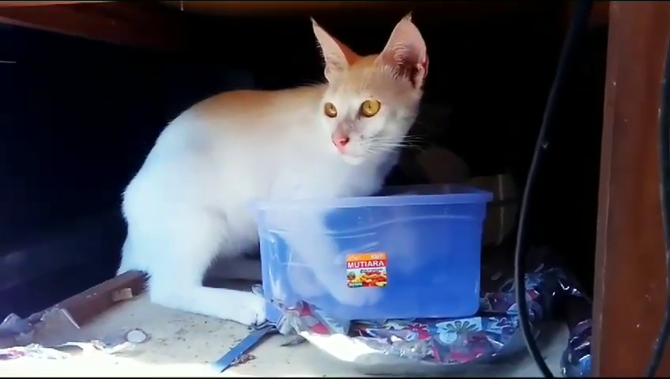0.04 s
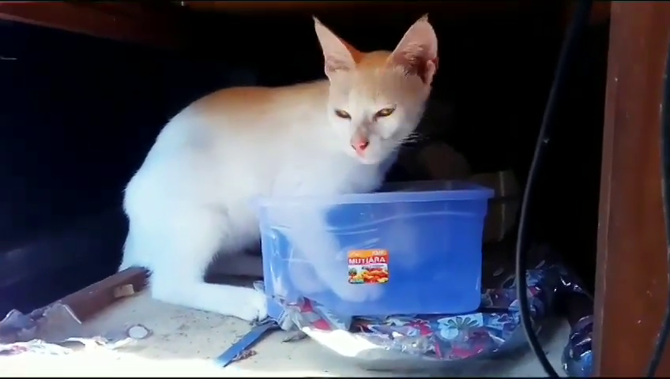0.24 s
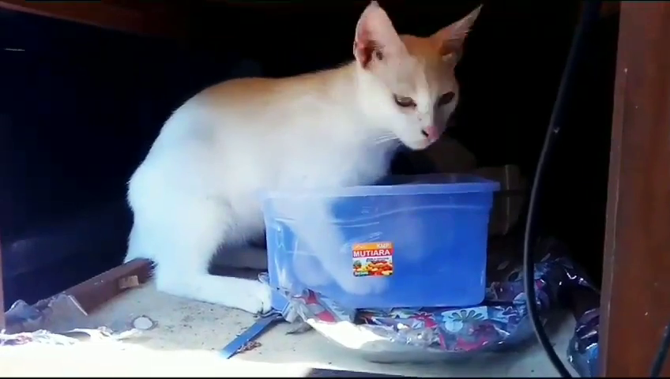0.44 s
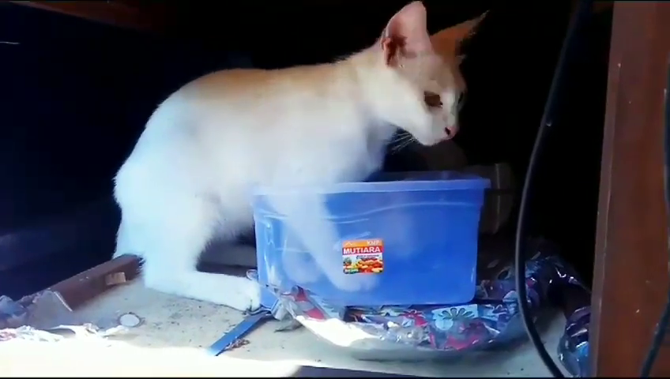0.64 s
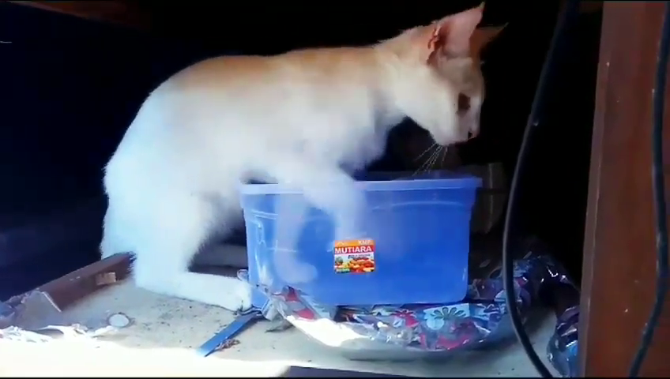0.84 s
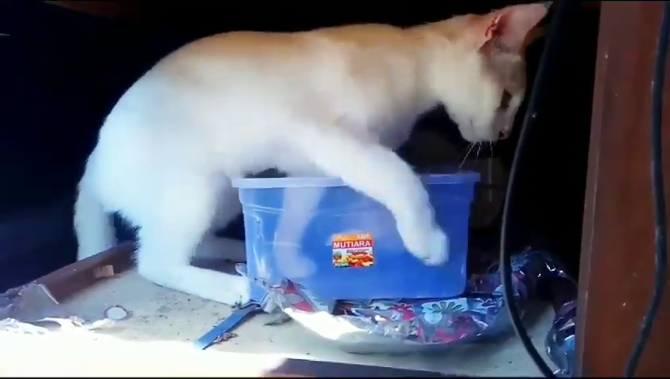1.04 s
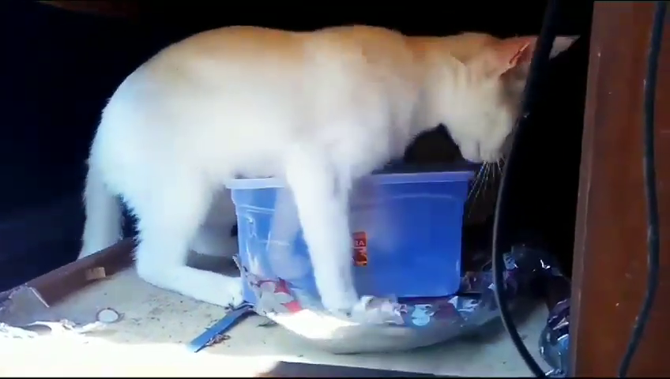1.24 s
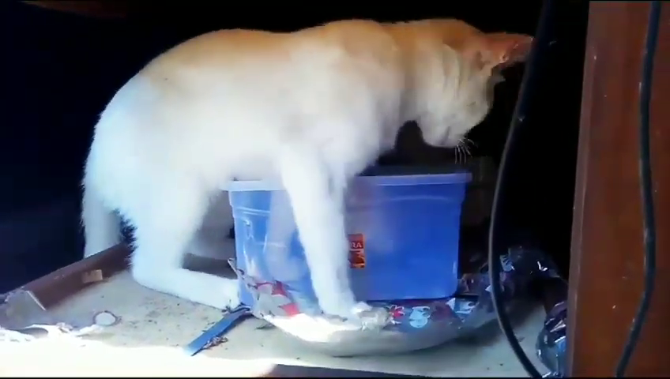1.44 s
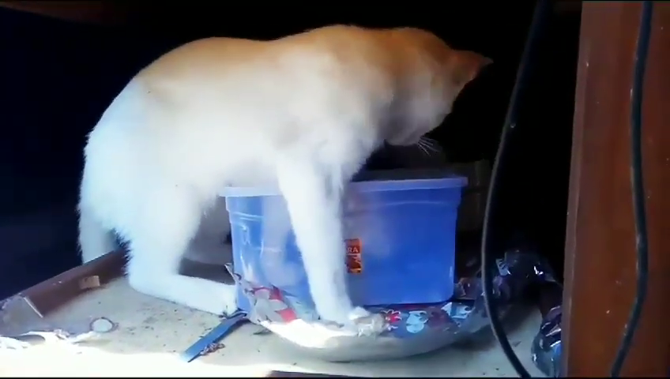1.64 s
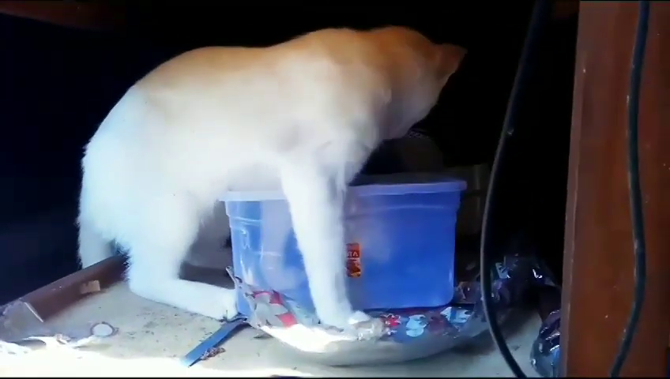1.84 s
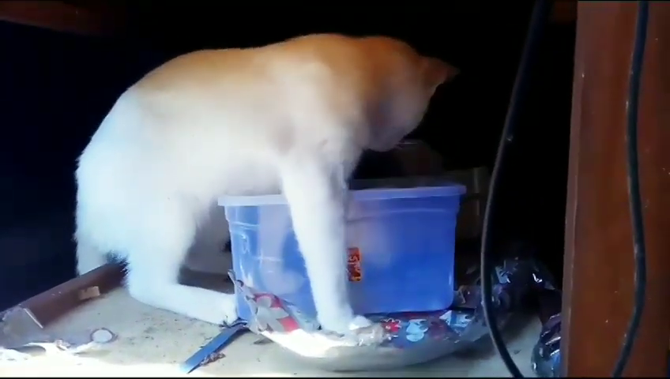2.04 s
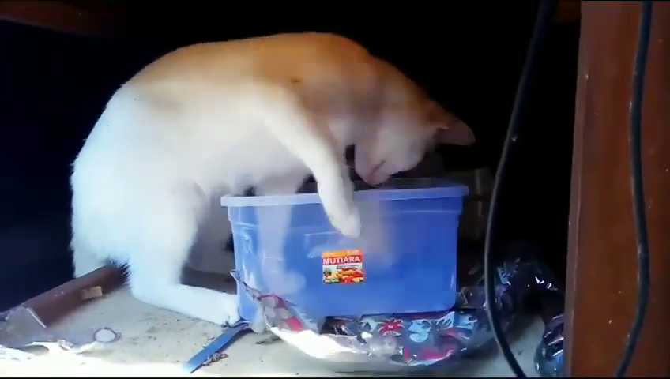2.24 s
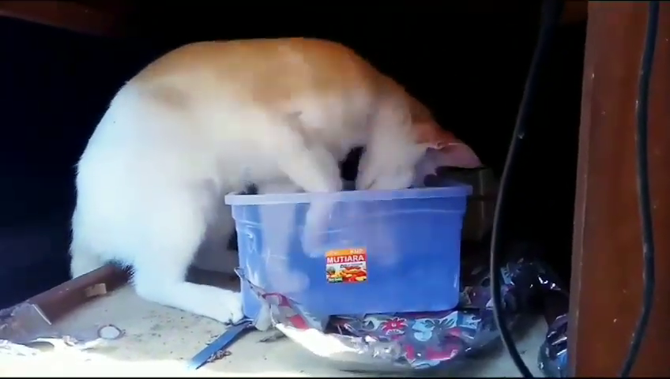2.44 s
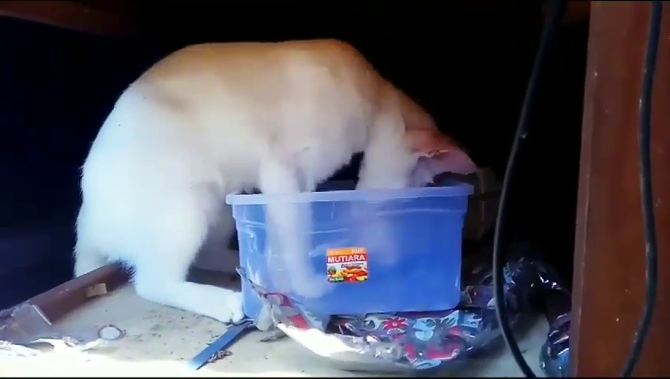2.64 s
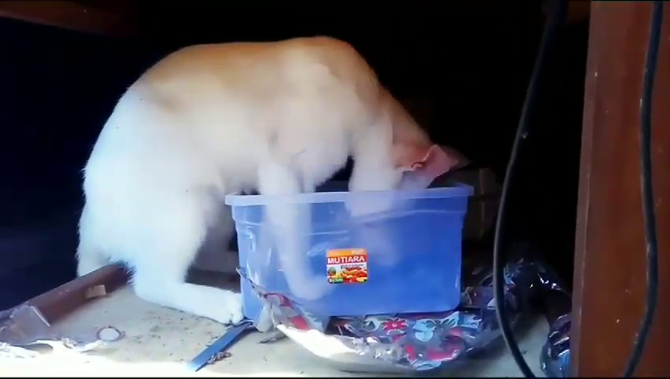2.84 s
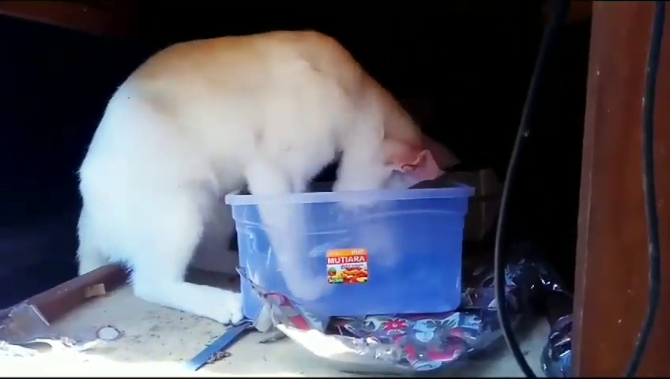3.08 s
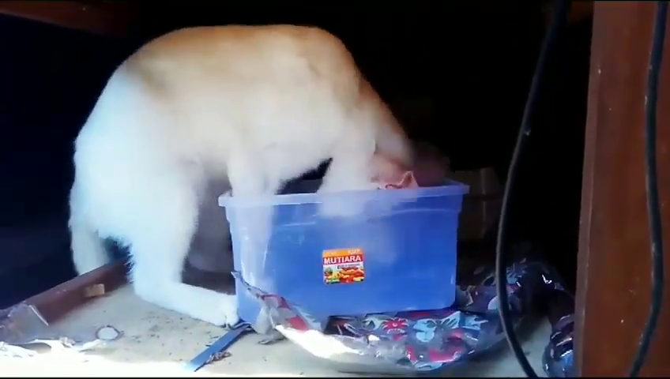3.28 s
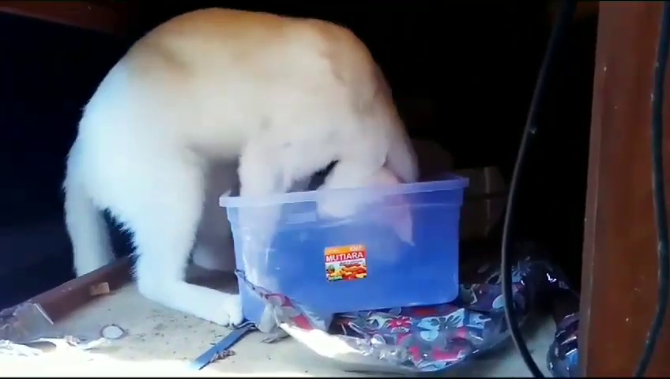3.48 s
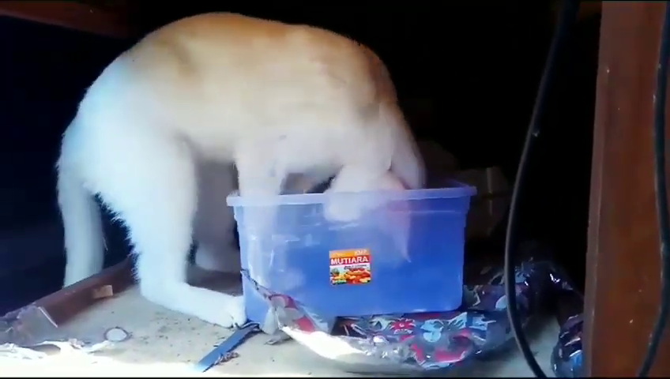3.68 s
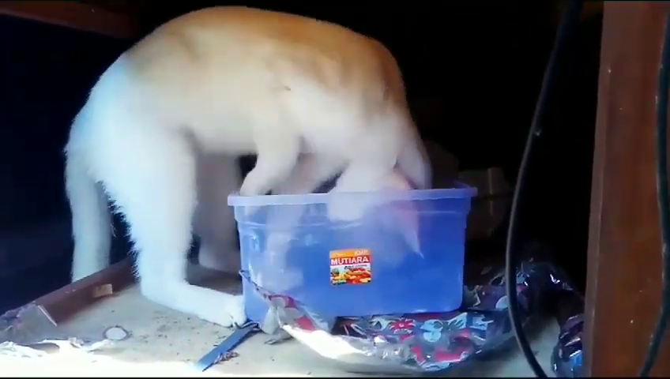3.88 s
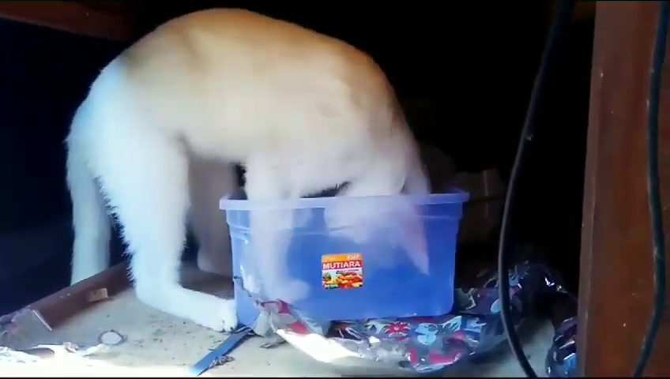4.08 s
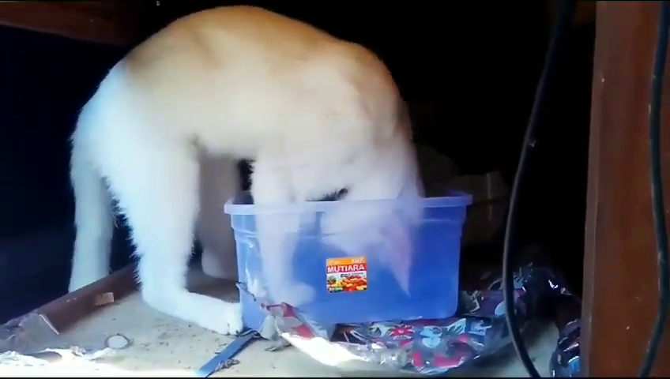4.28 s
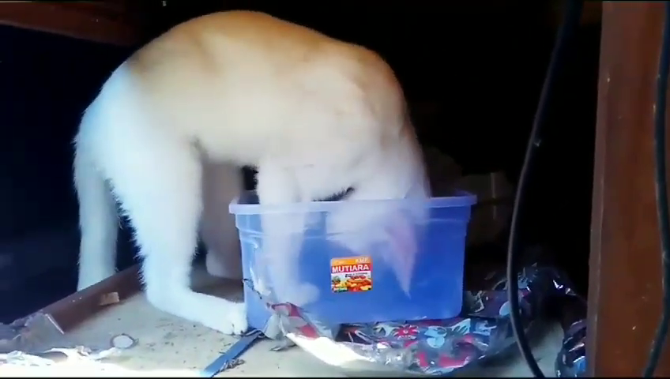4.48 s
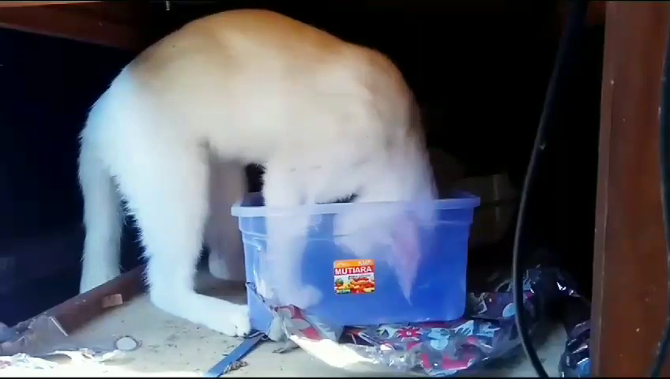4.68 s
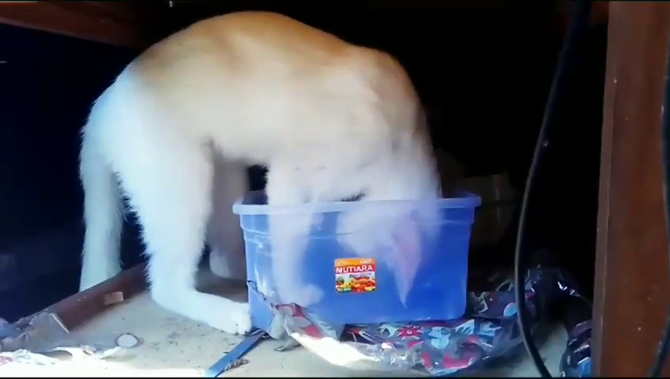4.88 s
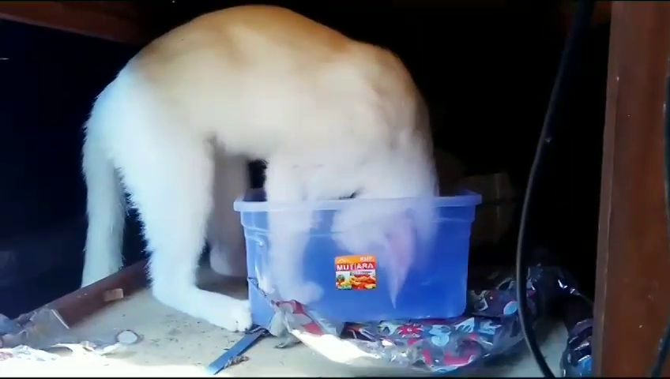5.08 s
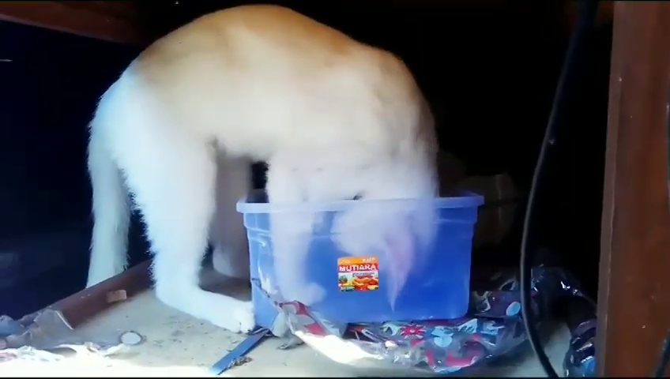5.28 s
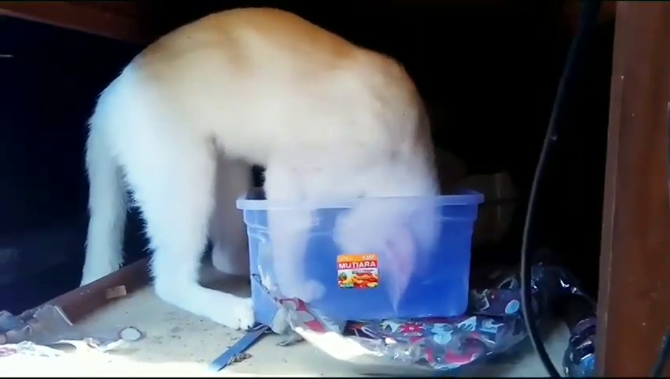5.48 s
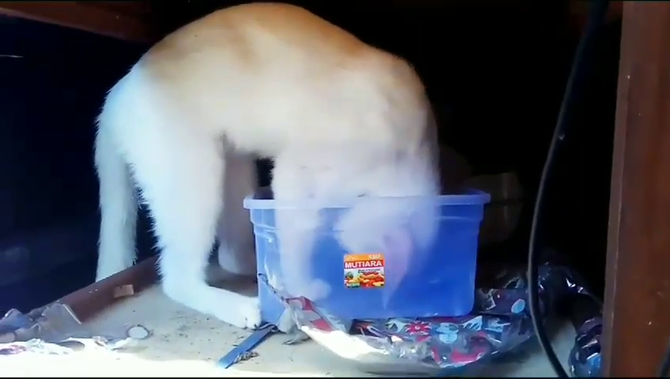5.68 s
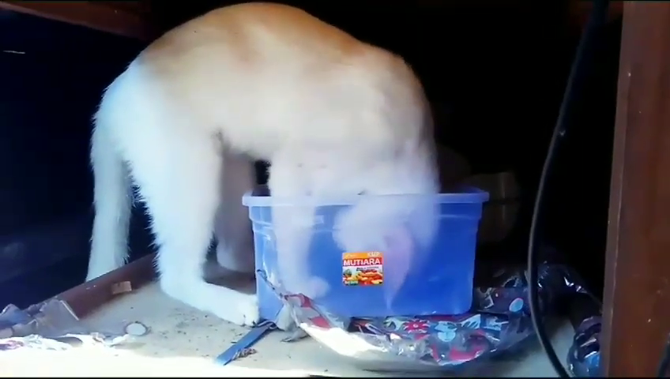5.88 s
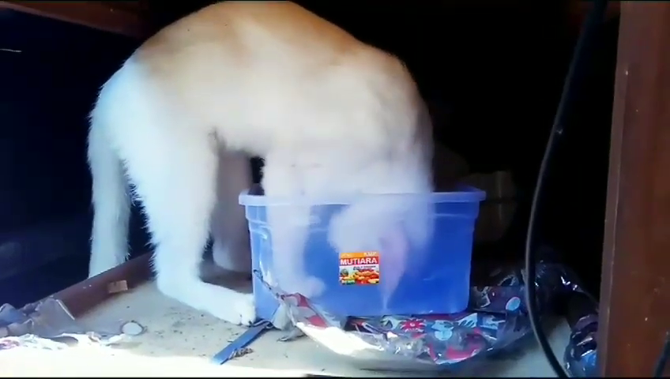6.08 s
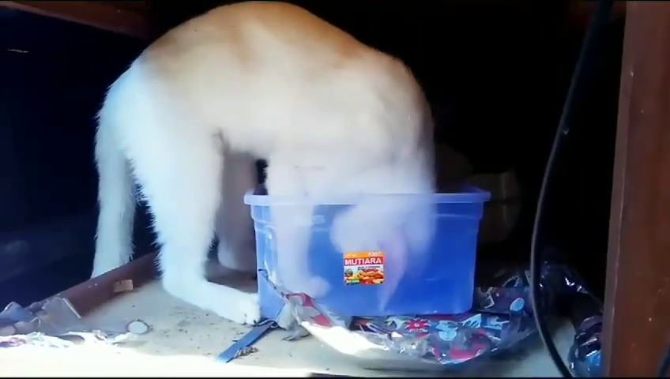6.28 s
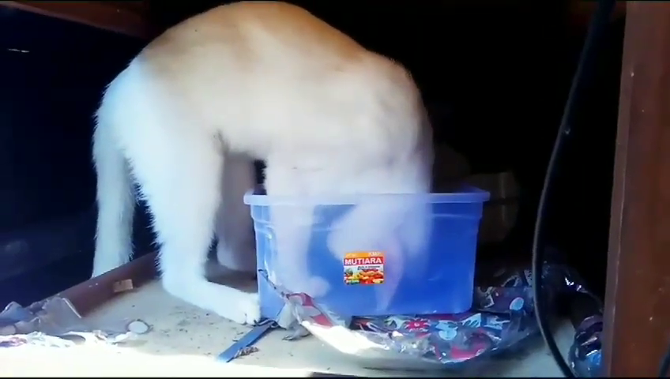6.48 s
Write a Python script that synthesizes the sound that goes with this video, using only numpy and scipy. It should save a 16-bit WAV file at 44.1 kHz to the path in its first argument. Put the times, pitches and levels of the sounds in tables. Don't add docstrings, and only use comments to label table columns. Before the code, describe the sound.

Faint distant engine rumble and a thin, whistling hiss, stronger on the right, underlie close plastic noises. A soft creak comes first, then a quick crinkly bump and sparse wrapper ticks. Hard knocks, thumps and scratchy scrapes follow on a light tub. Finally the tub bottom pops repeatedly in a steady licking rhythm, with grainy rasps, clicks and a brief low groan near the end. The echo is short and dry.

```python
import sys
import numpy as np
from scipy import signal
from scipy.fft import rfft, irfft
from scipy.io import wavfile
from scipy.ndimage import uniform_filter1d

SR = 44100
rng = np.random.default_rng(int(sys.argv[2]) if len(sys.argv) > 2 else 0)


def linear_from_db(decibels):
    return 10 ** (np.asarray(decibels, float) / 20)


def output_pcm(signal):
    pcm = np.clip(np.atleast_2d(signal).T, -1, 1) * 32767
    wavfile.write(sys.argv[1], SR, np.round(pcm).astype(np.int16))


N = 287973
TIME = np.arange(N) / SR

# [f/Hz, level/dB, t60/s]
THUD = [(119.4, -4, 0.061), (166.7, 1.5, 0.1), (229.4, -3.5, 0.25), (363, -3.5, 0.06)]
BOOM = [(418, -13.5, 0.023), (566, -3, 0.1), (580, -6, 0.19), (693.5, -3.5, 0.057), (804, 0, 0.24),
        (878.5, -5.5, 0.057), (978, -10.5, 0.016)]
KNOCK = [(1130, -10.5, 0.42), (1237, -11, 0.064), (1511, 3, 0.043), (1554, -3, 0.0093), (1816, -1.5, 0.036),
         (1990, -5, 0.034), (2300, -1.5, 0.026), (2891, 1.5, 0.0083), (2964, 0.5, 0.011),
         (3200, -18.5, 0.028), (3600, -5, 0.044), (4250, -15, 0.0026)]
# [f/Hz, level/dB]
CRACK = [(2800, -9.5), (4000, 9), (5500, 6.5), (6500, 7), (8000, 3), (12000, 2), (17000, -2)]
# [t/s, knock peak level/dB, boom relative level/dB, crack relative level/dB, hollow note f/Hz]
LICK_POPS = [
    (4.3873, -15, -11, -16.5, 852),
    (4.6953, -14, -5.5, -8, 878),
    (5.0192, -13, -9, -9.5, 873),
    (5.377, -12.5, -8, -9, 892),
    (5.7572, -14, -9, -11.5, 920),
    (6.12, -11.5, -13.5, -14, 907),
    (6.508, -13, -7.5, -10, 905),
]


def colour(x, points):
    hz, db = np.transpose(points)
    grid = np.fft.rfftfreq(4096, 1 / SR)
    cepstrum = irfft(np.interp(np.log(grid + 1), np.log(hz), db) * np.log(10) / 20)
    cepstrum[1:2048] *= 2
    cepstrum[2049:] = 0
    taps = irfft(np.exp(rfft(cepstrum)))[:2048]
    return signal.fftconvolve(np.atleast_2d(x), taps[None], axes=1)[:, :x.shape[-1]]


def walk(rate):
    k = int(SR / rate)
    held = np.repeat(rng.standard_normal(N // k + 1), k)
    return uniform_filter1d(uniform_filter1d(held, k), k)[:N]


def pair(length, alike_hz=700):
    same, own = rng.standard_normal(length), rng.standard_normal((2, length))
    low = signal.butter(1, alike_hz, fs=SR)
    return own + signal.lfilter(*low, same - own)


def swell(s, db, rise_s, fall_s):
    late = TIME[::32] - s
    rise = (np.maximum(-late, 0) / rise_s) ** 1.37
    return linear_from_db(db - 20 * rise - 20 * np.maximum(late, 0) / fall_s)


def blend(gains):
    return np.interp(TIME, TIME[::32], np.sqrt(np.sum(np.square(gains), axis=0)))


def body(x, modes, widen, patchy_db=0.):
    out = 0
    for k, (hz, db, t60) in enumerate(modes):
        pole = np.exp(-np.log(1000) * widen / (t60 * SR))
        feedback = [1, -2 * pole * np.cos(2 * np.pi * hz / SR), pole ** 2]
        mode = signal.lfilter([1 - pole, 0, pole - 1], feedback, x)
        out = out + (-1) ** k * linear_from_db(db + patchy_db * walk(28)) * mode
    return out / out.std()


def ring(modes, t, shorten, tilt_db=0, scatter=0.99):
    hz, db, t60 = np.array(modes).T[:, :, None]
    size, bend, turn, apart = rng.standard_normal((4, len(modes), 1))
    size, bend, turn = scatter * size, scatter * bend, scatter * turn
    ears = np.array([.5, -.5])[:, None, None] * apart * np.minimum(hz / 2200, 1.3)
    late = t - .00025 - np.array([.00007, 0])[:, None, None]
    waves = -np.cos(2 * np.pi * hz * (1 + .012 * bend) * late + .5 * turn + ears)
    level = linear_from_db(db + tilt_db * np.log2(hz / 2000) + 2 * size)
    out = np.sum(level * waves * 1000. ** (-t / (t60 * shorten)), axis=1)
    high = signal.butter(3, .7 * hz.min(), "high", fs=SR, output="sos")
    out = signal.sosfilt(high, out * np.minimum(t / .0003, 1))
    return out / np.abs(out).max()


def street():
    # [peak t/s, level/dB, rise t/s, fall t/s]
    traffic = [(0.0, -62.5, .3, 0.66), (.84, -57.5, 0.47, 0.68), (1.22, -52, 0.1, 0.12),
               (1.55, -59.5, 0.3, 0.72), (1.9, -56.5, 0.23, 0.17), (2.56, -62.5, 0.63, 0.4),
               (2.96, -57, 0.15, 0.16), (3.3, -60.5, .3, 3.1), (4.13, -58, 0.14, 0.24),
               (4.84, -53.5, 0.29, 0.14), (5.1, -60.5, 0.093, 1.4), (5.6, -55.5, 0.73, 0.94),
               (6.08, -56, 0.21, 2.1)]
    # [peak t/s, level/dB, rise t/s, fall t/s]
    motor = [
        (.3, -67.5, 1.5, 0.27),
        (.72, -72, 0.14, 1.1),
        (1.2, -68.5, 0.14, 0.82),
        (2.45, -63.5, 1.1, 0.15),
        (3.3, -73.5, 2.1, 30.0),
    ]
    # [f/Hz, level/dB per Hz]
    house = [(20, -104), (50, -102.5), (120, -87), (240, -96), (320, -103), (600, -105), (900, -112),
             (1500, -120)]
    rumble_modes = [(65.9, 3.0, 0.29), (80.0, -6, 0.06), (46.4, -8.5, 0.063)]  # f/Hz, level/dB, t60/s
    drone_modes = [(417.6, 4.5, 0.078), (613.0, 0.5, 0.26), (238.0, -11.5, 0.65)]
    rumble = body(rng.standard_normal(N), rumble_modes, 1.0)
    rumble *= blend([swell(*row) for row in traffic])
    hum = colour(pair(N, alike_hz=500), house) * np.sqrt(SR / 2) * linear_from_db(1.3 * walk(5.9))
    drone = body(pair(N), drone_modes, 1.34, patchy_db=3.5)
    drone = drone * blend([swell(*row) for row in motor])
    return rumble * linear_from_db(np.array([[-1.5], [1.5]])) + hum + drone


def hits(events, shorten, crack_s, trims_db, popped=False):
    # [f/Hz, level/dB, t60/s]
    bottom = [(1206, -7, 0.043), (1284, -1, 0.049), (1444, -1.5, 0.11), (1605, -15.5, 0.043),
              (1740, -2, 0.13), (2020, -6.5, 0.054), (2255, 4, 0.041), (2890, -0.5, 0.047),
              (2995, -1.5, 0.061), (3254, 1, 0.037), (3696, 1, 0.034), (4750, -12, 0.034)]
    # [f/Hz, level/dB, t60/s]
    undertones = [(511, -20, 0.034), (690, -11.5, 0.052)]
    knock_trim_db, boom_trim_db, crack_trim_db = trims_db
    flutter_s = .0023
    snap_s, snap_width_s, snap_hz = 0.0003, 0.00052, 1650
    out, t = np.zeros((2, N + SR)), np.arange(SR // 10) / SR
    hold = linear_from_db(-11 * np.clip((t - .0085) / 0.00058, 0, 1))
    flutter = hold * (.25 + np.exp(-(t % flutter_s) / .0006))
    bounce = np.r_[1, np.zeros(int(flutter_s * SR)), .55]
    rattle_band = signal.butter(2, [900, 3600], "band", fs=SR, output="sos")
    for s, db, boom_db, crack_db, *heavy in events:
        bright = [(hz, level_db + 0.42 * (crack_db - 1.0) * np.log2(hz / 8000)) for hz, level_db in CRACK]
        crack = colour(rng.standard_normal((2, len(t))) * np.exp(-t / crack_s) * flutter, bright)
        spot_hz = heavy[1] if heavy else 2200
        if popped:
            knock = ring(bottom, t, 0.78, scatter=.6)
            hollow = ring(undertones + [(spot_hz, 0, .08)], t, 1, scatter=.2)
        else:
            near = [(hz, mode_db + 4 * np.exp(-(np.log2(hz / spot_hz) / 0.2) ** 2), t60)
                    for hz, mode_db, t60 in KNOCK]
            knock = signal.lfilter(bounce, [1], ring(near, t, shorten, 0.42 * (crack_db + 21.5)))
            hollow = ring(BOOM, t, shorten, tilt_db=4.5)
        rattle = signal.sosfilt(rattle_band, pair(len(t), 2700))
        rattle = rattle * np.exp(-t / (0.0032 * shorten)) * np.minimum(t / 0.0012, 1)
        knock += linear_from_db(-7.5 if popped else -2.5) * rattle
        if popped:
            swing = t - snap_s - snap_width_s
            knock -= linear_from_db(-3) * np.cos(2 * np.pi * snap_hz * swing) * np.exp(-(swing / snap_width_s) ** 2)
        blow = linear_from_db(knock_trim_db) * hold * knock
        blow += linear_from_db(boom_db + boom_trim_db) * hold ** 2.2 * hollow
        blow += linear_from_db(crack_db + crack_trim_db) * crack / np.abs(crack).max()
        if heavy:
            thud = ring(THUD, t, 0.98) * np.minimum(t / 0.0005, 1) * (1 - t / t[-1])
            blow += linear_from_db(heavy[0] - 8.0) * thud
        start = int((s + .0005) * SR)
        out[:, start:start + len(t)] += linear_from_db(db) * blow
    return out[:, :N]


def blows():
    # [t/s, peak level/dB, crack relative level/dB]
    creases = [(0.794, -60, 1), (1.176, -33, 14.5), (1.1912, -32.5, 15.5), (1.3086, -53, 16.5),
               (1.324, -61, -17), (1.3491, -42.5, -7), (1.4086, -46, -1), (1.4224, -58, 7), (1.462, -49, 1),
               (1.5349, -55.5, 9), (1.636, -57.5, -5), (1.9936, -59.5, 3), (2.1338, -39, 0),
               (2.1484, -58, 26), (2.157, -45.5, 14), (2.173, -54.5, 23), (2.1815, -51, 23),
               (2.195, -37, 0), (2.2022, -39.5, 9), (2.2728, -42, 9.5), (2.384, -53, 15), (2.401, -49, 8),
               (2.4899, -38.5, 13), (2.545, -52, 7), (2.576, -55, -36), (2.6154, -64, 10),
               (2.6384, -57.5, 18), (2.515, -65, 13), (2.556, -60, 14), (2.757, -66, 9), (2.787, -55, 3),
               (2.316, -56, 8), (2.721, -44, 3), (2.7347, -41.5, -3.5), (3.1034, -51.5, 29)]
    # [t/s, knock peak level/dB, then boom, crack and thud relative level/dB]
    paws = [(1.112, -40, -7, -11, 10.5), (1.122, -43.5, -7, -15, 13.5), (1.2053, -38, -18, 8, -2),
            (2.872, -42, 2.5, 0.5, -3.5), (3.0955, -35, -17, -34, -18), (3.2363, -41, -10, -22, -12),
            (3.2442, -21.5, -16, -35, 8), (3.251, -20.5, -15, -14, 0.5), (3.259, -28, -5, -14, 6),
            (3.6098, -14.5, -10, -7, -31), (3.715, -29, -7, -46, 1), (4.0862, -24, -5, -37, 3),
            (4.0942, -17.5, -19, -3.5, -23), (4.153, -37, -6, 3, 4)]
    # [t/s, peak level/dB, boom and crack relative level/dB]
    claws = [(3.3424, -28.5, 0, -1), (3.479, -36, -24, -5), (3.8934, -29, -10, -2), (3.985, -53.5, -30, 15),
             (3.917, -36, -9, -3), (4.5076, -37, -16, -7), (4.536, -43, -20, 2), (4.6264, -44.5, -20, 3.5),
             (4.812, -40, -20, -7.5), (4.893, -44, -21, -1), (4.933, -39, -22.5, 0), (5.163, -49, -20, 1),
             (5.201, -40, -23, 5), (5.2686, -37, -23, 3.5), (5.281, -44, -19, -2), (5.6068, -35, -25, -0.5),
             (5.629, -28, -9.5, -10), (5.68, -51, -25, 2.5), (5.8905, -58, -25, -5),
             (5.9825, -33, -27, -10), (5.99, -37, -26, 1), (6.171, -35, -20, -4), (6.365, -43, -23, -20),
             (6.3733, -40, -23, 3.5), (4.374, -51, -30, -10)]
    light = [(s, db, -32, crack_db) for s, db, crack_db in creases] + claws
    knocks = [(*row, 1450) for row in paws]
    pops = [(s, db, boom_db, crack_db, -48, hz) for s, db, boom_db, crack_db, hz in LICK_POPS]
    out = hits(light, 0.66, .003, [4, -2.1, 8])
    out += hits(knocks, 1.99, 0.0063, [3, 4.5, 5])
    return out + hits(pops, 1.99, 0.0063, [3, 4.5, 5], popped=True)


def creak():
    # [f/Hz, level/dB, t60/s]
    rim = [(760, 3, 0.2), (1500, -5, 0.1), (1800, -5, .1), (3040, -8, .1), (4600, -8, .1)]
    return body(pair(N), rim, 4.9) * linear_from_db(-65.5) * np.exp(-((TIME - 0.91) / 0.081) ** 2)


def contact():
    # [peak t/s, level/dB, rise t/s, fall t/s, brightness level/dB]
    rustles = [
        (1.11, -50.5, 0.015, 0.22, 4),
        (1.187, -38.5, 0.016, 0.081, 5.5),
        (1.205, -36, 0.027, 0.022, -0.5),
        (1.34, -62, 0.11, 0.25, 4),
        (2.19, -52, 0.061, 0.09, 5),
        (2.3, -67, 0.013, 0.32, 6),
        (2.58, -68, 0.14, 0.33, 1),
        (2.76, -65.5, 0.078, 0.43, 3),
        (2.835, -49, 0.033, 0.037, -5.5),
        (2.95, -58, 0.09, 0.12, 2.5),
    ]
    scrapes = [(3.15, -53.5, .04, 0.17, -2), (3.205, -44.5, 0.028, 0.16, -1),
               (3.248, -32.5, 0.022, 0.073, 5), (3.35, -43.5, 0.012, 0.12, -1.5),
               (3.42, -52.5, .06, 0.17, 4), (3.49, -50, 0.033, 0.037, -1), (3.63, -48, 0.013, 0.12, -3),
               (3.725, -37, 0.022, 0.098, -3), (3.8, -50, 0.074, 0.4, -6), (3.9, -46.5, 0.11, 0.11, 1),
               (4.055, -46.5, 0.03, 0.23, 5.5), (4.095, -37.5, 0.032, 0.038, -2.5),
               (4.14, -43.5, 0.024, 0.041, 4), (4.24, -53.5, 0.11, 0.2, 2.5)]
    licks = [(4.514, -49.5, 0.052, 0.15, 1), (4.61, -55, 0.14, 0.03, 2.5), (4.83, -60.5, 0.017, .15, -2),
             (4.915, -49, 0.15, 0.056, -1), (5.192, -49, 0.05, 0.11, 4.5), (5.275, -59, .03, 0.025, 4),
             (5.52, -54.5, 0.057, 0.17, 7), (5.625, -53.5, 0.18, 0.03, 3), (5.9, -53, 0.046, 0.12, 8),
             (5.99, -51, 0.075, 0.073, 4.5), (6.29, -55.5, 0.057, 0.18, 8), (6.38, -54.5, 0.21, 0.1, 4)]
    # [peak t/s, level/dB, fall t/s]
    shoves = [(1.014, -61, 0.039), (1.108, -76, .08), (1.204, -52, 0.14), (2.896, -43, 0.046),
              (3.115, -53, 0.11), (3.255, -43, 0.27), (3.632, -41, .06), (3.748, -46, 0.071),
              (3.943, -43.5, 0.068), (4.096, -41, 0.044), (4.158, -40, 0.051), (4.8, -57.5, 0.2),
              (5.449, -55, 0.13), (5.649, -52, 0.22), (6.018, -50, 0.14), (6.3, -52, 0.75)]
    # [peak t/s, level/dB]
    presses = [
        (1.21, -44),
        (3.85, -63),
        (4.532, -52),
        (4.898, -42.5),
        (5.23, -51),
        (5.62, -52.5),
    ]
    settles = [(s + 0.028, -49, 0.014, 0.11, 0) for s, *_ in LICK_POPS]
    hollow = [swell(s, db, 0.038, 0.071) for s, db in presses]
    thuds = [swell(s, db, 0.028, fall_s) for s, db, fall_s in shoves]
    layers = [[], hollow, [], thuds]
    # boom, sizzle and thud of each kind of contact, dB relative to the rasp
    kinds = [(rustles, (-9, 0.091, -9)), (scrapes, (-5.5, -2.5, -19.5)),
             (licks, (-1.5, -1.6, -11)), (settles, (1.9, -34.5, -5.5))]
    for strokes, (boom_db, sizzle_db, thud_db) in kinds:
        for *shape, bright_db in strokes:
            levels_db = [0, boom_db - 0.24 * bright_db, sizzle_db + bright_db, thud_db]
            for layer, db in zip(layers, levels_db):
                layer.append(linear_from_db(db) * swell(*shape))
    return [blend(layer) for layer in layers]


def rubbing():
    rasp_gain, boom_gain, sizzle_gain, thud_gain = contact()
    slips = (rng.random(N) < 300 / SR) * linear_from_db(np.minimum(5 * rng.exponential(size=N), 10))
    grain = 1.5 + signal.lfilter([1], [1, -np.exp(-1 / (.001 * SR))], slips)
    rasp = pair(N) * grain * linear_from_db(1.5 * walk(30))
    sizzle = colour(rasp / np.sqrt(grain) * linear_from_db(3.2 * walk(50)), CRACK)
    boom = body(pair(N) * grain * linear_from_db(1.5 * walk(40)), BOOM, 1.6, patchy_db=2.5)
    thud = body(pair(N) * linear_from_db(3 * walk(25)), THUD, 1.3)
    out = linear_from_db(3.0) * rasp_gain * body(rasp, KNOCK, 1.8, patchy_db=2.5)
    out = out + boom_gain * boom
    out = out + linear_from_db(1.56) * sizzle_gain * sizzle / sizzle.std()
    return out + linear_from_db(1.1) * thud_gain * thud


def thumps():
    # [t/s, peak level/dB, panel f/Hz, t60/s]
    pads = [(1.013, -57, 500, .05), (1.112, -30, 1650, 0.038), (1.12, -38, 1680, .04),
            (1.205, -24.5, 647, 0.041), (2.576, -51, 1520, .03), (3.6105, -19, 2300, 0.028),
            (3.6108, -19, 2670, 0.031), (5.81, -45, 920, .04), (5.982, -39, 1600, .04),
            (6.366, -40, 1560, 0.036), (6.16, -37, 690, 0.057), (3.192, -30, 1900, 0.046),
            (3.204, -33, 815, 0.036), (3.219, -39, 736, 0.043), (3.2365, -17.5, 730, 0.028),
            (3.243, -21, 482, 0.034), (3.2872, -19, 696, 0.024), (3.2965, -26, 670, 0.029),
            (3.2987, -32.5, 236, 0.043), (3.309, -37, 282, 0.031), (3.408, -38, 792, .04),
            (3.424, -36, 836, .04), (2.4895, -37, 2190, 0.023), (3.096, -31.5, 1490, 0.037),
            (3.098, -35.5, 800, 0.035), (3.716, -29, 1456, 0.034), (3.773, -33.5, 1380, 0.025),
            (3.872, -37, 840, .03), (4.0863, -20, 1650, 0.013), (4.722, -27, 1300, 0.022),
            (4.733, -42, 850, .03), (4.888, -40, 813, 0.069), (5.065, -38, 860, 0.035),
            (5.228, -39.5, 757, 0.043), (5.427, -36, 930, 0.029), (5.633, -45, 1220, 0.053)]
    out, t = np.zeros((2, N + SR)), np.arange(SR // 10) / SR
    for s, db, hz, t60 in pads:
        panel = ring([(hz, 0, t60), (1.22 * hz, -9, t60)], t, 0.85) * np.minimum(t / 0.0016, 1)
        start = int(s * SR)
        out[:, start:start + len(t)] += linear_from_db(db) * panel
    return out[:, :N]


def groans():
    # [t/s, peak level/dB, pitch ratio]
    slips = [(1.202, -34, 1.1), (3.503, -37, 1), (3.521, -52, 1), (6.217, -31, 1.05), (6.231, -31, 1.02),
             (6.245, -27.5, 0.97), (6.261, -31, 0.96), (6.268, -31, 0.94), (6.282, -33, .92),
             (6.3, -43, 0.97), (6.314, -39, 0.95), (6.332, -40, 0.94), (6.35, -46, .82)]
    # [f/Hz, level/dB, t60/s]
    wall = [(381.2, 2.5, 0.17), (441, 7.5, 0.052), (571, 4.3, 0.048)]
    out, t = np.zeros((2, N + SR)), np.arange(SR // 10) / SR
    for s, db, ratio in slips:
        bent = [(hz * ratio, *rest) for hz, *rest in wall]
        start = int(s * SR)
        out[:, start:start + len(t)] += linear_from_db(db) * ring(bent, t, 0.79) * np.minimum(t / 0.0042, 1)
    return out[:, :N]


def scene():
    tub = blows() + creak() + rubbing() + thumps() + groans()
    room_t60_s, room_db = 0.15, -14
    t = np.arange(SR // 3) / SR
    tail = pair(len(t)) * 1000. ** (-t / room_t60_s) * (t > .004)
    echo = colour(tail, [(100, 0.5), (1000, -2.5), (4000, -5.5), (16000, -9.5)])
    echo /= np.sqrt(np.sum(echo ** 2, axis=1, keepdims=True))
    return tub + linear_from_db(room_db) * signal.fftconvolve(tub, echo, axes=1)[:, :N] + street()


def low_pass(x):
    return signal.sosfilt(signal.butter(12, 16670, fs=SR, output="sos"), x)


def record(dry):
    # [f/Hz, level/dB]
    mic_left = [(30, -5), (1000, -1), (2500, 1), (4500, -2), (7000, 1.5), (11000, 2), (13500, -6),
                (14500, 7), (15200, 9), (15700, 10.5), (16200, -22), (17000, -66.5)]
    mic_right = [(30, -4), (1000, -0.5), (2500, -5.5), (4200, 0.5), (6300, 7), (7000, 7.5), (8600, -17.5),
                 (11000, -45.5), (13600, -59), (14400, -22), (15200, 1), (15700, 2.5), (16200, -38),
                 (17000, -27.5)]
    # [f/Hz, level/dB per Hz]
    hiss_left = [(300, -112), (1200, -111), (3000, -112), (6000, -113), (8000, -119), (13600, -125),
                 (15100, -113), (15600, -118), (16100, -140)]
    hiss_right = [(300, -113), (2400, -113), (4100, -110), (5500, -96), (6350, -83), (6900, -92.5),
                  (7600, -104), (8300, -118), (13500, -122), (14500, -109), (15200, -102), (15600, -107),
                  (16100, -137)]
    hiss = rng.standard_normal((2, N)) * np.sqrt(SR / 2)
    left = colour(dry[0], mic_left) + colour(hiss[0], hiss_left)
    right = colour(dry[1], mic_right) + colour(hiss[1], hiss_right)
    return low_pass(np.vstack([left, right]))


dry = scene()
out = record(dry)
output_pcm(out)
```